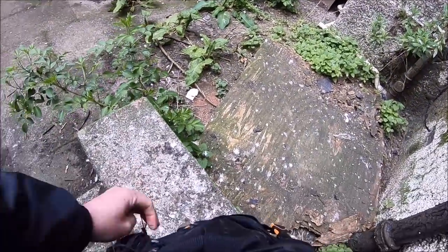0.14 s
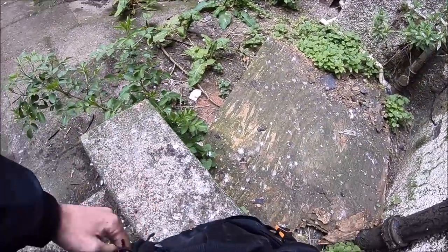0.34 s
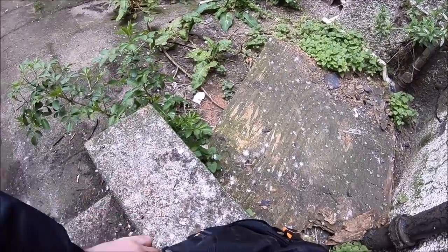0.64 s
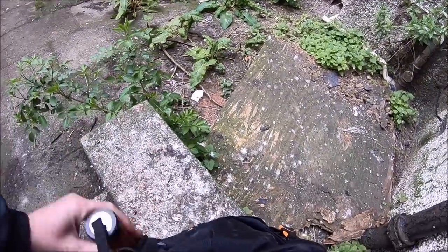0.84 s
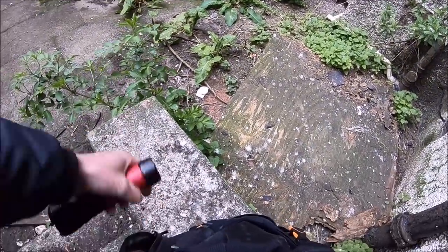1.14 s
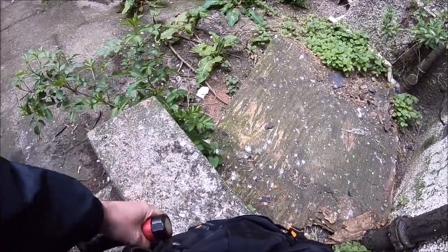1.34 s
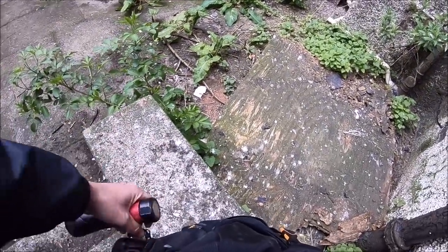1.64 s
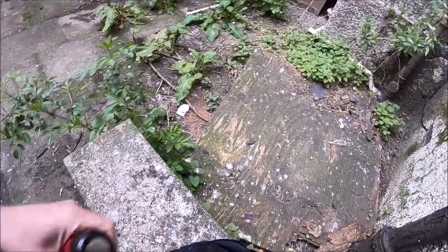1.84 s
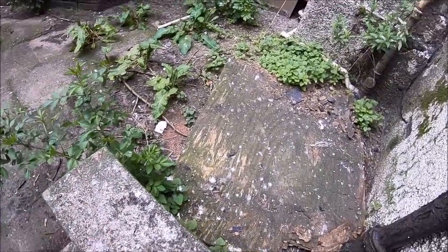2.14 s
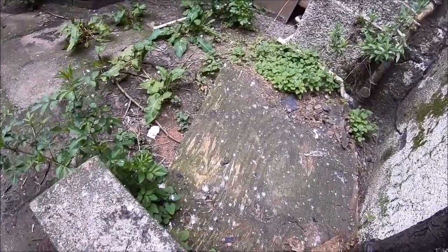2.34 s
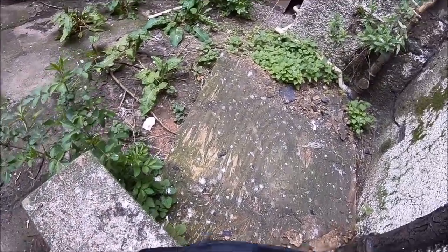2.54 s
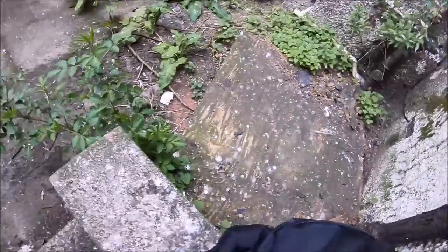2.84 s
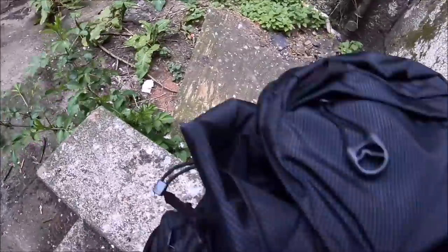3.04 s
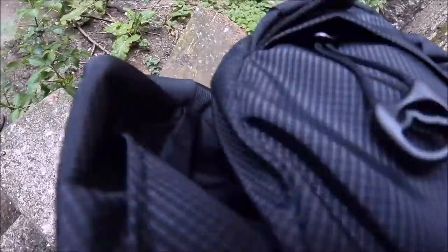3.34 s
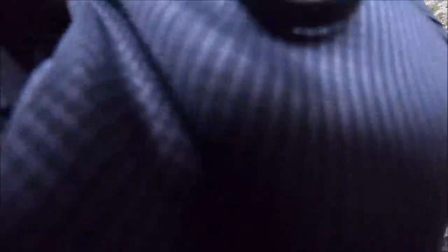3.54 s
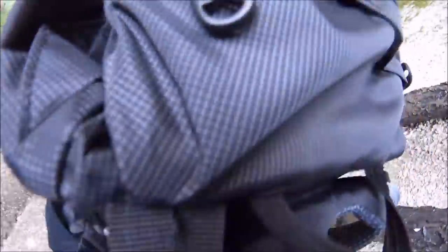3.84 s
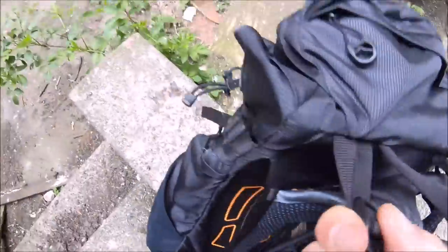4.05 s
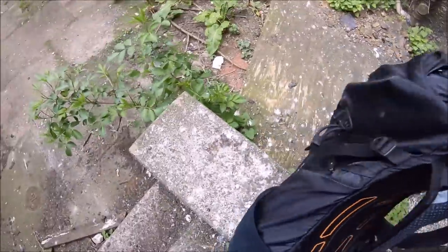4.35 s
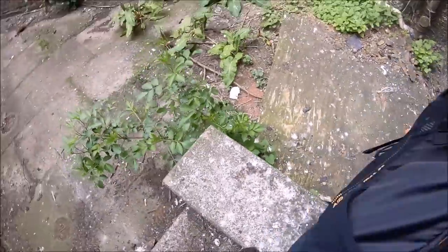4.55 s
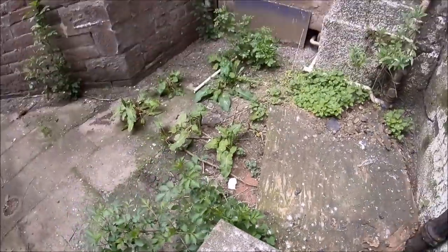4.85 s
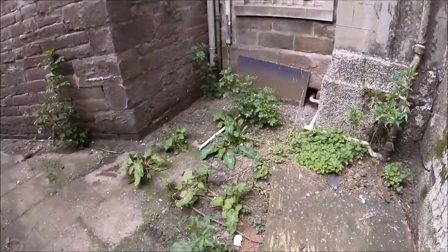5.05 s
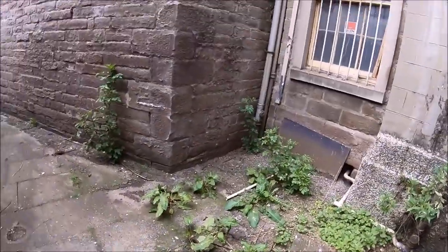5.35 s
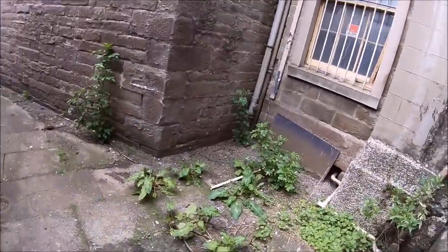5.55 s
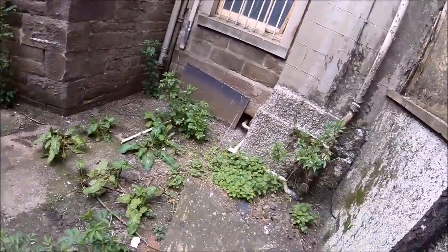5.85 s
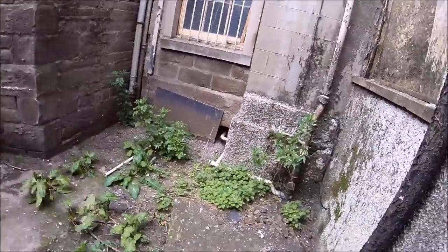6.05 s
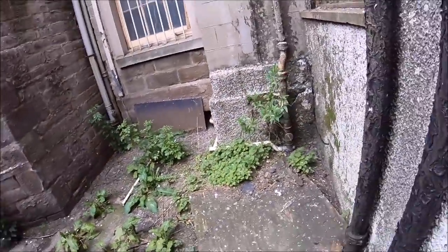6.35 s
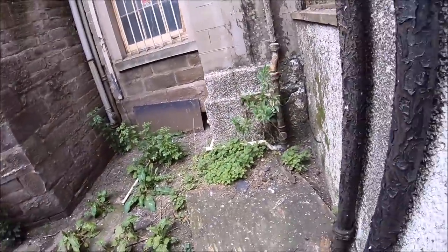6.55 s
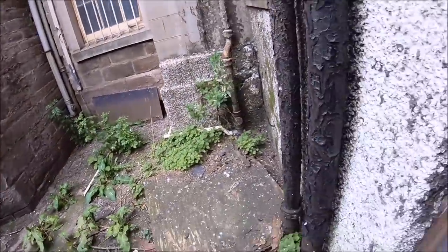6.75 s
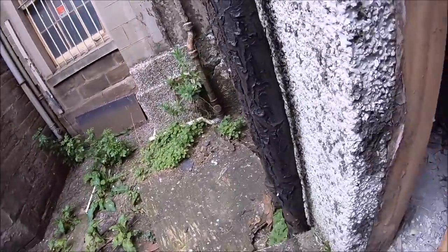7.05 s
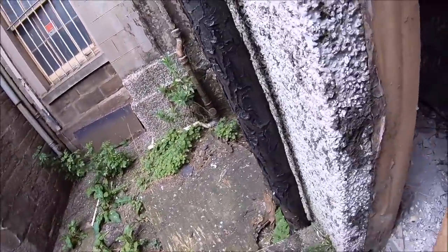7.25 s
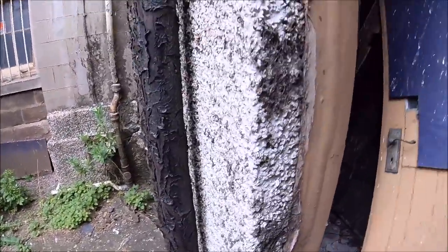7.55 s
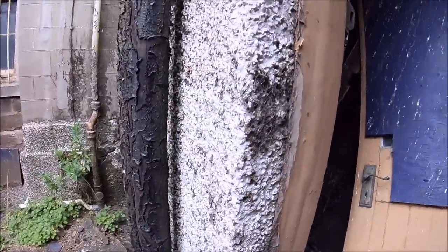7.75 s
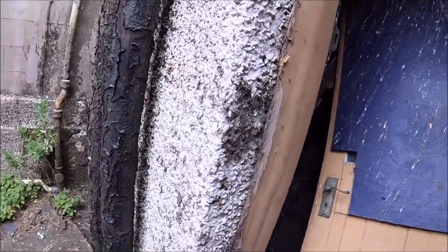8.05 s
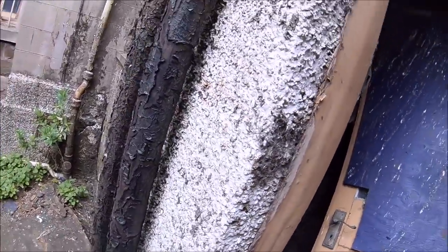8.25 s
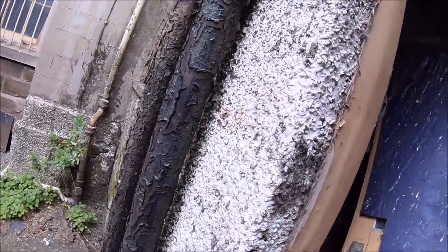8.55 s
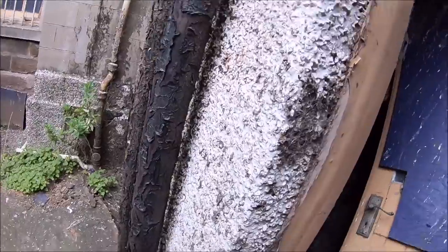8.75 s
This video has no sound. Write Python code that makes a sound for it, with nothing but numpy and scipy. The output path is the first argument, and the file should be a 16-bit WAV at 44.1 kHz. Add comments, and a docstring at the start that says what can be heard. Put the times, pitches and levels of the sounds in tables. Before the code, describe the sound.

Close cloth rustle and a short falling zip, heavy bag bumps and a loud crack on the microphone, a sudden lull, then strap rubs.

```python
"""Rucksack shouldered against a body-worn camera

Outdoors, at arm's length and closer: a nylon rucksack is zipped, lifted against the camera and shouldered, then
the wearer shifts and steps. Cloth is grainy filtered noise, the zip a wavering tone with a scratch at every tooth,
knocks and buckles are ringing modes. Wind, straps and knocks shake the housing and reach its two microphone ports
largely in opposed phase, until the camera falls back to a single port and both channels become alike."""
import sys
import numpy as np
from scipy import signal
from scipy.fft import rfft, irfft, next_fast_len
from scipy.io import wavfile
from scipy.ndimage import uniform_filter1d

SR = 44100
rng = np.random.default_rng(int(sys.argv[2]) if len(sys.argv) > 2 else 0)


def output_pcm(signal):
    """Save a mono or channel-first signal as 16-bit PCM at the path in sys.argv[1].

    Samples are clipped to [-1, 1] before scaling.
    """
    pcm = np.clip(np.atleast_2d(signal).T, -1, 1) * 32767
    wavfile.write(sys.argv[1], SR, np.round(pcm).astype(np.int16))


N = 392931


def amp(db):
    """Amplitude factor of a level in dB."""
    return 10 ** (np.asarray(db) / 20)


def rms_one(x):
    """Scales x to an rms of 1."""
    return x / np.sqrt(np.mean(x ** 2) + 1e-20)


def in_time(rows):
    """Draws each column after the first as a curve over the whole scene."""
    s, *columns = np.transpose(rows)
    return [np.interp(np.arange(N) / SR, s, c) for c in columns]


def step(at_s, width_s):
    """A smooth rise from 0 to 1."""
    return .5 + .5 * np.tanh((np.arange(N) / SR - at_s) / width_s)


def during(span, edge_s):
    """Near 1 inside the span, near 0 outside, with smooth edges."""
    return step(span[0], edge_s) - step(span[1], edge_s)


def low_pass(x, order, cut_hz):
    """Butterworth low-pass."""
    return signal.sosfilt(signal.butter(order, cut_hz, fs=SR, output="sos"), x)


def coloured(x, points, lag_rad=0.):
    """Weights x by a spectrum drawn over log frequency, and delays every frequency by one phase."""
    size = next_fast_len(N)
    hz, db = np.transpose(points)
    gain = amp(np.interp(np.log(np.fft.rfftfreq(size, 1 / SR) + 1), np.log(hz), db))
    return irfft(rfft(x, size) * gain * np.exp(-1j * lag_rad), size)[..., :N]


def drift(rate_hz):
    """Slow random wandering of spread 1: noise through two equal poles, computed at every 40th sample."""
    r = np.exp(-80 * np.pi * rate_hz / SR)
    noise = rng.standard_normal(N // 40 + 2002)
    slow = signal.lfilter([1], [1, -2 * r, r * r], noise)[2000:]
    return np.interp(np.arange(N) / 40, np.arange(len(slow)), rms_one(slow))


def friction(spectrum, per_s, spread_db, grain_db, flutter_db, flutter_rate, patchy_db):
    """Fibres slip in uneven grains over a smooth hiss, the pressure flutters, each octave comes and goes; rms 1."""
    sizes = amp(spread_db * np.minimum(rng.exponential(1, N), 5))
    grains = sizes * (rng.random(N) < per_s / SR) * rng.choice([-1, 1], N)
    slips = amp(grain_db) * rms_one(grains) + rng.standard_normal(N)
    rest = coloured(slips * amp(flutter_db * drift(flutter_rate)), spectrum)
    out = 0
    for edge_hz in 250 * 2 ** np.arange(6):
        band = signal.sosfiltfilt(signal.butter(2, edge_hz, fs=SR, output="sos"), rest)
        out = out + band * amp(patchy_db * drift(flutter_rate / 2))
        rest = rest - band
    return rms_one(out + rest)


def ring(blows, hz, t60):
    """A damped mode: a unit click sets a sine of height 1 ringing, down 60 dB after t60 seconds."""
    r, w = amp(-60 / (t60 * SR)), 2 * np.pi * hz / SR
    return signal.lfilter([0, np.sin(w)], [1, -2 * r * np.cos(w), r * r], blows + 1e-18)


EDGE_DB = -30   # bursts start and end this far below their hold


def with_bursts(curve, starts_s, levels_db, rise_s, hold_s, fall_s):
    """Gains of a slow curve, with bursts (rise, hold, fall) added in power; each hold begins at its start time."""
    power, t = amp(in_time(curve)) ** 2, np.arange(N) / SR
    for db, s, rise, hold, fall in zip(levels_db, *np.broadcast_arrays(starts_s, rise_s, hold_s, fall_s)):
        span = slice(max(int((s - rise) * SR), 0), int((s + hold + fall) * SR))
        corners_s = [s - rise, s, s + hold, s + hold + fall]
        shape_db = np.interp(t[span], corners_s, [EDGE_DB, 0, 0, EDGE_DB])
        power[:, span] += amp(shape_db + db[:, None]) ** 2
    return np.sqrt(power)


# steady shaking of the housing by wind and straps: (time [s], deep rumble level [dB], shudder level [dB])
HOUSING_SHAKE = [(0.0, -28.5, -36.5), (0.75, -33.5, -37), (1.17, -38, -43), (1.7, -34, -40.5),
                 (2.05, -27, -34), (2.55, -38, -42.5), (2.95, -31, -46.5), (3.4, -30, -33.5),
                 (3.77, -44, -46.5), (4.14, -47, -36), (4.29, -59.5, -63), (5.76, -47, -47.5),
                 (6.03, -32.5, -31), (6.45, -37, -49), (6.97, -37, -38), (7.72, -48, -54.5),
                 (8.91, -41.5, -50.5)]
# tugs on the straps that jolt the housing: (time [s], deep rumble level [dB], shudder level [dB])
STRAP_JOLTS = [(0.86, -25.5, -24), (2.367, -18, -69), (2.479, -40.5, -22), (2.629, -38, -19.5),
               (2.87, -18, -39), (3.327, -20.5, -55), (3.631, -15, -22.5), (6.55, -26, -39)]
# spectra of the deep rumble and the shudder before levelling: (frequency [Hz], density [dB per Hz])
DEEP_SPECTRUM = [(15, -7), (30, 19), (55, 21.5), (80, 4), (120, -77)]
SHUDDER_SPECTRUM = [(30, -42), (80, 13), (125, 12.5), (170, 3), (260, -11), (400, -62)]
JOLT_RISE_S, JOLT_HOLD_S, JOLT_FALL_S = 0.11, 0.021, 0.031
GUST_EVEN_S = .2   # the deep rumble holds its level over this time


def shake():
    """Wind and straps shake the housing the microphones sit in: an evened deep rumble and a lumpy shudder."""
    jolts = np.array(STRAP_JOLTS)
    deep_gain, shudder_gain = with_bursts(
        HOUSING_SHAKE, jolts[:, 0], jolts[:, 1:], JOLT_RISE_S, JOLT_HOLD_S, JOLT_FALL_S)
    deep = friction(DEEP_SPECTRUM, per_s=19, spread_db=4.5, grain_db=-8.5,
                    flutter_db=3.5, flutter_rate=6.7, patchy_db=5.5)
    shudder = friction(SHUDDER_SPECTRUM, per_s=50, spread_db=4.5, grain_db=-2.5,
                       flutter_db=3.0, flutter_rate=30.0, patchy_db=2.0)
    deep = deep / np.sqrt(uniform_filter1d(deep ** 2, int(GUST_EVEN_S * SR)))
    return deep_gain * deep + shudder_gain * shudder


# cloth stirring all the while: (time [s], fine rustle level [dB], coarse rub level [dB])
CLOTH_STIRRING = [(0.0, -57.5, -43), (1.1, -58.5, -46), (1.75, -62.5, -44.5), (2.13, -56, -43.5),
                  (2.56, -59, -45.5), (2.66, -70, -45), (2.99, -82, -66), (3.3, -71, -52.5),
                  (3.57, -74, -56.5), (3.69, -81, -53.5), (3.75, -101, -75.5), (3.86, -75.5, -62),
                  (4.8, -72.5, -62.5), (4.96, -55.5, -57), (5.77, -55.5, -48.5), (5.95, -63, -51.5),
                  (6.35, -68.5, -48), (6.9, -58, -48), (7.46, -64.5, -49.5), (8.08, -53.5, -42),
                  (8.46, -60, -45)]
# single strokes of cloth, strap or shoe:
# (time [s], rise [s], hold [s], fine rustle level [dB], coarse rub level [dB])
CLOTH_STROKES = [(0.0, .01, 0.068, -45, -32), (0.15, 0.068, 0.2, -53.5, -67),
                 (0.67, 0.34, 0.067, -50.5, -43.5), (0.834, 0.0097, 0.033, -45, -38),
                 (0.9, 0.075, 0.075, -44.5, -49.5), (1.578, .02, 0.016, -55, -41.5),
                 (1.779, 0.026, 0.24, -47.5, -37.5), (2.478, 0.0035, 0.045, -55, -36.5),
                 (2.581, 0.018, 0.017, -54.5, -31), (2.697, 0.035, 0.016, -55.5, -32),
                 (2.766, 0.086, 0.056, -65.5, -41), (3.586, 0.0022, 0.013, -44.5, -28.5),
                 (3.633, 0.034, 0.014, -51, -28.5), (3.95, 0.042, 0.028, -65.5, -68.5),
                 (4.42, 0.6, 0.08, -63.5, -88), (5.979, .02, 0.1, -61, -42.5),
                 (6.083, 0.0064, 0.0068, -47, -27), (6.211, .005, 0.014, -62.5, -41.5),
                 (6.417, 0.032, 0.083, -52.5, -38), (6.928, 0.019, 0.026, -54, -39.5),
                 (6.99, 0.02, 0.05, -59.5, -36.5), (7.035, .03, 0.19, -52, -47),
                 (8.208, 0.14, 0.12, -44, -54), (8.606, 0.3, 0.36, -46.5, -39.5)]
STROKE_FALL_S, FALL_PER_HOLD = .016, 1.1   # longer strokes fade more slowly


def cloth_gains():
    """Fine and coarse gain of the cloth: the stirring plus every stroke."""
    s, rise, hold, *levels_db = np.transpose(CLOTH_STROKES)
    fall = STROKE_FALL_S + FALL_PER_HOLD * hold
    return with_bursts(CLOTH_STIRRING, s, np.transpose(levels_db), rise, hold, fall)


# spectra of cloth heard through the air, coarse and fine, before levelling: (frequency [Hz], density [dB per Hz])
RUB_SPECTRUM = [(100, -2.5), (250, 1), (500, -10.5), (1000, -15.5), (2000, -25), (3200, -58), (6000, -70)]
FINE_TWO_PORTS_SPECTRUM = [(1500, 8.5), (3000, 4.5), (4500, -3), (6300, 1.5), (7800, -7.5), (10000, -16.5),
                           (13000, -26.5), (16000, -34)]
CLOTH_GRAIN = dict(per_s=800, spread_db=5.0, grain_db=-8.0, flutter_db=1.5, flutter_rate=18.0, patchy_db=2.5)


def cloth_in_air(fine_gain, rub_gain):
    """Fibres slipping near the camera radiate a coarse rub and a fine rustle."""
    rub = rub_gain * friction(RUB_SPECTRUM, **CLOTH_GRAIN)
    return rub + fine_gain * friction(FINE_TWO_PORTS_SPECTRUM, **CLOTH_GRAIN)


CRINKLES_PER_S, CRINKLE_CYCLES = 260, 22   # base rate before clumping; cycles to ring down 60 dB


def crinkles():
    """Creases in the nylon pop in clumps, uneven in size, each ringing briefly at one of 16 pitches; rms 1."""
    sizes = amp(2.6 * np.minimum(rng.exponential(1, N), 4))
    pops = sizes * (rng.random(N) < CRINKLES_PER_S * amp(5. * drift(8)) / SR)
    pitches_hz, dealt = np.geomspace(1100, 6500, 16), rng.integers(0, 16, N)
    return rms_one(sum(ring(pops * (dealt == k), hz, CRINKLE_CYCLES / hz) for k, hz in enumerate(pitches_hz)))


# dry snaps of stiff fabric and grit: (time [s], level of the noise before smoothing [dB])
FABRIC_SNAPS = [(0.204, -40), (0.275, -33), (.371, -32.5), (0.558, -36), (5.494, -41), (6.144, -42),
                (7.872, -38.5)]
SNAP_S = .0006   # decay time constant


def snaps():
    """Stiff fabric and grit snap: each a dying burst of slightly dulled noise."""
    t, out = np.arange(600) / SR, np.zeros(N)
    for s, db in FABRIC_SNAPS:
        noise = np.convolve(rng.standard_normal(600), [.5, 1, .5], "same")
        out[round(s * SR):round(s * SR) + 600] += amp(db) * noise * np.exp(-t / SNAP_S)
    return out


# ringing ticks of buckles and gear: (time [s], level before the swell and decay [dB], pitch [Hz])
BUCKLE_TICKS = [(0.841, -32, 1880), (0.912, -26.5, 1250), (0.912, -32, 3870), (0.923, -30, 1390),
                (.959, -34, 4800), (2.151, -36, 7250), (2.638, -41, 1800), (2.65, -37, 1960),
                (2.711, -34, 2180), (3.594, -26, 3940), (3.635, -17.5, 1270), (3.64, -23, 1230),
                (3.646, -19.5, 800), (3.652, -28, 770), (6.092, -37, 4340)]


def ticks():
    """Buckles and gear tick: each a brief sine at its own pitch that swells and dies."""
    t, out = np.arange(600) / SR, np.zeros(N)
    for s, db, hz in BUCKLE_TICKS:
        envelope = (1 - np.exp(-t / 0.0004)) * np.exp(-t / 0.0024)
        out[round(s * SR):round(s * SR) + 600] += amp(db) * np.sin(2 * np.pi * hz * t) * envelope
    return out


# slider on the zip: (time [s], tooth rate [teeth per s], relative level [dB])
ZIP_SLIDER = [(1.774, 436, -38.5), (1.786, 572, -35.5), (1.866, 490, -38), (1.931, 430, -31.5),
              (1.973, 397, -29.5), (1.981, 210, -25), (2.009, 152, -31.5), (2.048, 77, -30.5)]
ZIP_SCRATCH_DB = -14.5   # against the tone's scale


def zip_slider():
    """One tooth per cycle: a wavering tone with overtones, more ragged when slower, and a scratch at every tooth."""
    per_s, db = in_time(ZIP_SLIDER)
    ragged = 0.033 * 500 / per_s
    phase = 2 * np.pi * np.cumsum(per_s * (1 + ragged * drift(68.0))) / SR
    tone = 0
    for k in range(6):
        overtone_gain = amp(-8.5 * k ** 0.85 + 2.67 * drift(49))
        tone = tone + overtone_gain * np.sin((k + 1) * phase + .5 * k * drift(57))
    scratch = coloured(rng.standard_normal(N), RUB_SPECTRUM) * (1 + np.sin(phase)) ** 2
    moving = during((ZIP_SLIDER[0][0], ZIP_SLIDER[-1][0]), .003)
    return moving * amp(db + 3) * (tone + amp(ZIP_SCRATCH_DB) * rms_one(scratch))


SCUFF_S = 0.0013   # how long a blow drags


def scuffs(count):
    """A blow drags over the housing: unit-energy dying noise with a click added at its start, one row per blow."""
    rows = rng.standard_normal((count, 1000)) * np.exp(-np.arange(1000) / SR / SCUFF_S)
    rows /= np.sqrt(np.sum(rows ** 2, axis=1, keepdims=True))
    rows[:, 0] += .8
    return rows


def strike(times, levels_db, modes, blows, spread_db, tilts_db):
    """Every blow drives each mode with a strength of its own; a tilt favours the upper or lower modes."""
    out = np.zeros(N)
    strengths_db = spread_db * rng.standard_normal((len(times), len(modes)))
    middle_octave = np.log2([hz for hz, _, _ in modes]).mean()
    for (hz, db, t60), own_db in zip(modes, strengths_db.T):
        drive = np.zeros(N)
        drives_db = levels_db + db + own_db + tilts_db * (np.log2(hz) - middle_octave)
        for s, drive_db, blow in zip(times, drives_db, blows):
            drive[round(s * SR):round(s * SR) + len(blow)] += amp(drive_db) * blow
        out += ring(drive, hz, t60)
    return out


# knocks on the housing: (time [s], relative crack level [dB], thud drive level [dB],
# glint level against the crack [dB], thud tilt [dB per octave], crack tilt [dB per octave])
HOUSING_KNOCKS = [(2.419, -52, -21.5, -33, -9.5, 15.5), (2.479, -30.5, -33, -28, -20, 19.5),
                  (2.592, -15.5, -30, -48, -3, 12), (2.603, -18, -24, -31, 0, 26.5),
                  (2.7, -27, -36, -24, 5, -23), (2.795, -31, -27.5, -35, 5.5, -18.5),
                  (3.28, -17, -18, -35, -5.5, 7.5), (3.332, -28, -30, -45, 12.5, -11),
                  (3.482, -20.5, -25, -52, -14.5, 3), (3.586, -12, -23.5, -17, 3, 14),
                  (3.662, -1, -14, -35, 1, 3.5), (4.1, -49, -31, -36, 3.5, -16),
                  (5.993, -36, -23.5, -21, -2.5, 18), (6.012, -20.5, -20, -23, 0, -5),
                  (6.084, -33, -25.5, 8.5, 14.5, -3), (6.256, -46, -24.5, -16, -0.5, -9),
                  (6.654, -30, -43, -28, 18.5, 1), (6.732, -50, -24, -25, -5, -2.5),
                  (6.908, -31, -43.5, -31, 17.5, -2), (6.928, -47, -22.5, -28, 8.5, 4),
                  (6.992, -36.5, -36.5, -28, -2, -5)]
# modes of the housing, low body, shell and bright glint: (frequency [Hz], relative level [dB], t60 [s])
THUD_MODES = [(53.3, -21.5, 0.11), (83.5, -4.5, 0.29), (150.6, 5.5, 0.031), (282, -4, 0.016)]
SHELL_MODES = [(645, -9.5, 0.039), (890, -18.5, 0.0062), (1330, -20.5, 0.01), (1900, -6.5, 0.012),
               (2117, -11.5, 0.012)]
GLINT_MODES = [(3630, -9, 0.0061), (5700, -26.5, 0.019), (7300, 2, 0.0006)]
SHELL_CUT_HZ = 2020   # the housing passes little above its shell modes


def knocks():
    """Thud, shell and glint modes ring at each knock; a soft push drives the thud, scuffs drive the others."""
    s, crack_db, thud_db, bright_db, tilt_db, crack_tilt_db = np.transpose(HOUSING_KNOCKS)
    push = np.hanning(90) / 45 * rng.choice([-1, 1], (len(s), 1))
    thud = strike(s, thud_db, THUD_MODES, push, spread_db=1.5, tilts_db=tilt_db)
    shell = strike(s, crack_db - 10, SHELL_MODES, scuffs(len(s)), spread_db=2, tilts_db=crack_tilt_db)
    glint = strike(s, crack_db + bright_db, GLINT_MODES, scuffs(len(s)), spread_db=-13.5, tilts_db=0)
    return thud + low_pass(shell, 2, SHELL_CUT_HZ), glint


# spectra of cloth rubbing on the housing, before levelling: coarse under the bag, coarse under the strap,
# and fine under either: (frequency [Hz], density [dB per Hz])
BAG_RUB_SPECTRUM = [(110, -15), (300, 8), (420, -5.5), (680, -2.5), (950, -11.5), (1150, -17.5),
                    (1320, -12), (1700, -13), (2200, -11.5), (2800, -22), (3400, -35.5), (6000, -67)]
STRAP_RUB_SPECTRUM = [(100, -31.5), (290, 9.5), (420, -6.5), (545, 2), (660, -10.5), (765, -3),
                      (900, -18.5), (1090, -11.5), (1900, -28), (2900, -48), (5000, -73)]
FINE_ON_HOUSING_SPECTRUM = [(1500, -34.5), (2200, 2.5), (2800, -8), (3500, -4), (4150, -1), (4900, -11),
                            (6300, -7), (7300, -14.5), (14000, -58)]


def cloth_on_housing(fine, rub, bag, strap):
    """Where rucksack or strap rests on the camera, fibre slips pass straight into the housing."""
    bag_rub = bag * friction(BAG_RUB_SPECTRUM, **CLOTH_GRAIN)
    strap_rub = strap * friction(STRAP_RUB_SPECTRUM, **CLOTH_GRAIN)
    rustle = fine * (bag + strap) * friction(FINE_ON_HOUSING_SPECTRUM, **CLOTH_GRAIN)
    return rub * (bag_rub + strap_rub) + rustle


# spectrum of fine rustle through the air at the single port, before levelling:
# (frequency [Hz], density [dB per Hz])
FINE_ONE_PORT_SPECTRUM = [(1500, 7), (3000, -5), (4100, 3.5), (5000, 1), (6300, 0.5), (7200, -9),
                          (9500, -18), (11000, -36), (12800, -18), (16000, -35)]


def rustle_at_one_port(gain):
    """Fine fibre slips reach the single port through the air."""
    return gain * friction(FINE_ONE_PORT_SPECTRUM, **CLOTH_GRAIN)


# how far the difference of the ports outweighs their sum for a shaken housing: (frequency [Hz], level [dB])
PORTS_OPPOSED = [(30, -0.5), (60, 9), (150, 8.5), (800, 11.5), (1500, 11), (2300, -4.5), (4000, -1)]
OPPOSED_LAG_RAD = 1.46          # the difference lags the sum
ONE_PORT_S, SWITCH_S = 4.33, .08   # middle and width of the fall to one port
BAG_TOUCHES, STRAP_TOUCHES = (2.46, 4.177), (5.96, 7.05)   # resting on the housing (from [s], to [s])
PORT_CUT_HZ = 6940              # the ports dull sharp clicks
ZIP_SHAKE_DB, ZIP_SHAKE_CUT_HZ = -18, 130   # slow teeth shake the housing
CRINKLE_DB = -9                 # against the fine rustle


def scene():
    """Air and housing sounds meet at the two ports as a sum and a difference, which give the two channels."""
    fine, rub = cloth_gains()
    one_port = step(ONE_PORT_S, SWITCH_S)
    two_ports = 1 - one_port
    bag, strap = during(BAG_TOUCHES, 0.073), during(STRAP_TOUCHES, 0.024)
    early = 1 - step(BAG_TOUCHES[0], 0.024)   # until the bag touches

    air = cloth_in_air(fine * early, rub * (1 - bag - strap))
    # air sound differs at random between the ports
    air_apart = early * cloth_in_air(amp(-2.0) * fine, amp(-3.5) * rub)
    near = rustle_at_one_port(fine * one_port * (1 - strap))
    knock, glint = knocks()
    contact = knock + cloth_on_housing(fine, rub, bag, strap)
    slider = zip_slider()
    contact += amp(ZIP_SHAKE_DB) * low_pass(slider, 4, ZIP_SHAKE_CUT_HZ)
    sharp = snaps() + ticks() + slider + glint + fine * amp(CRINKLE_DB) * crinkles()
    pointed = low_pass(sharp, 4, PORT_CUT_HZ)
    rumble = shake()

    # at two ports the sum of the contact sound leads its difference in phase
    leading = coloured(contact, [(20, 0), (SR, 0)], -OPPOSED_LAG_RAD)
    both = rumble + contact * one_port + leading * two_ports + air + near + pointed
    apart = (coloured(contact, PORTS_OPPOSED) + air_apart + amp(-20) * pointed) * two_ports
    # a little independent shaking joins the opposed rumble; the bass is the last to merge
    rumble_apart = coloured(rumble + amp(-22.5) * shake(), PORTS_OPPOSED, OPPOSED_LAG_RAD)
    apart += rumble_apart * (1 - step(ONE_PORT_S + .03, 0.24))
    return np.array([both + apart, both - apart])


CUTOFF_HZ = 15750


def record(dry):
    """The microphone chain: faint self-noise in the treble, the highest peaks rounded, the top cut off."""
    treble = coloured(rng.standard_normal((2, N)), [(6000, -30), (11000, -6), (13000, 0)])
    hiss = amp(-102) * rms_one(treble)
    rounded = dry / (1 + (dry / .95) ** 6) ** (1 / 6)
    top_cut = signal.ellip(12, .5, 80, CUTOFF_HZ, fs=SR, output="sos")
    return signal.sosfilt(top_cut, rounded + hiss)


dry = scene()
out = record(dry)
output_pcm(out)
```